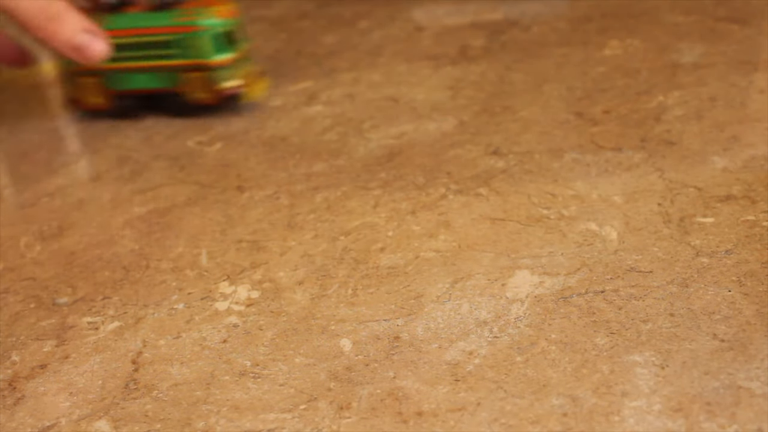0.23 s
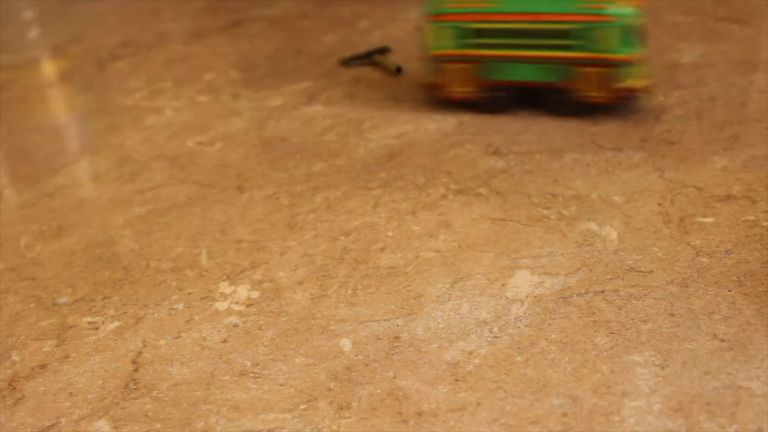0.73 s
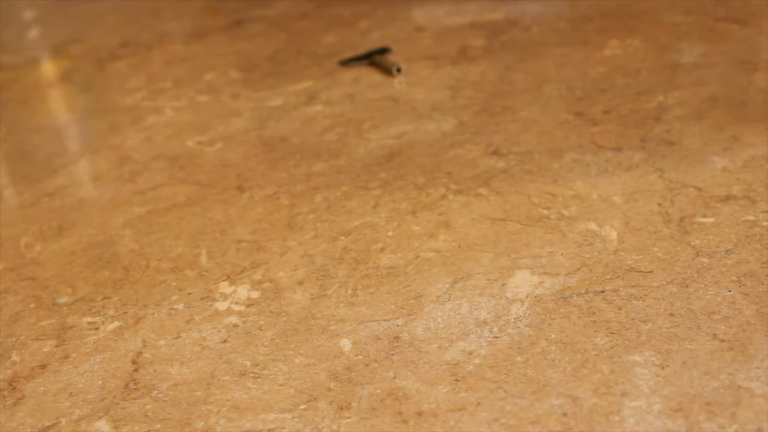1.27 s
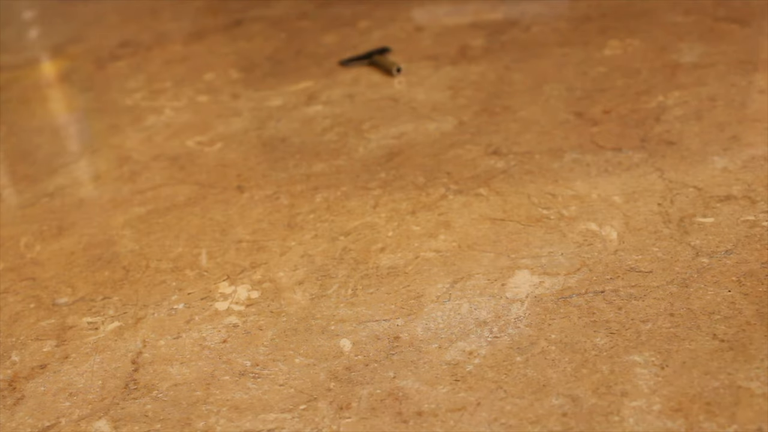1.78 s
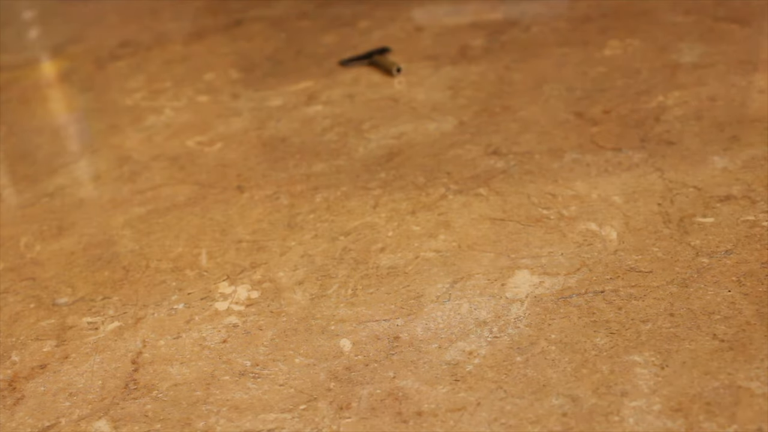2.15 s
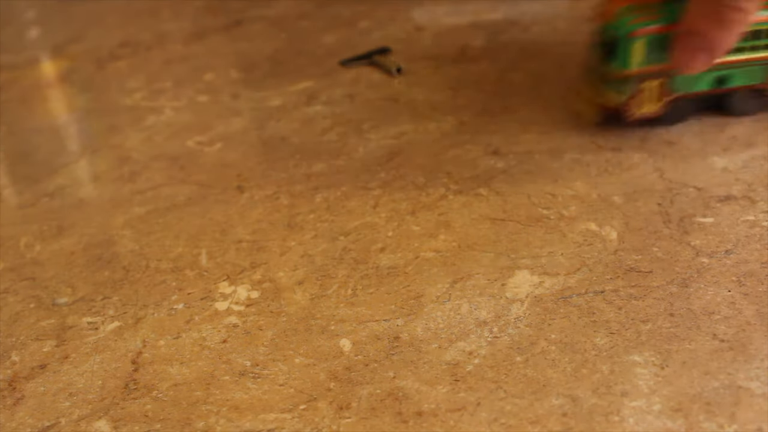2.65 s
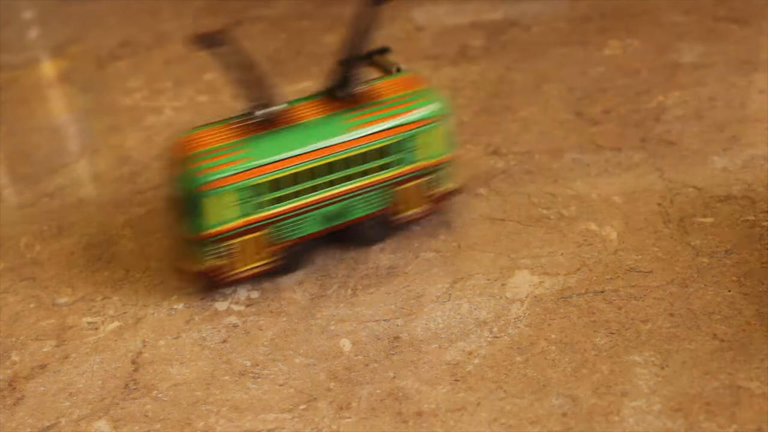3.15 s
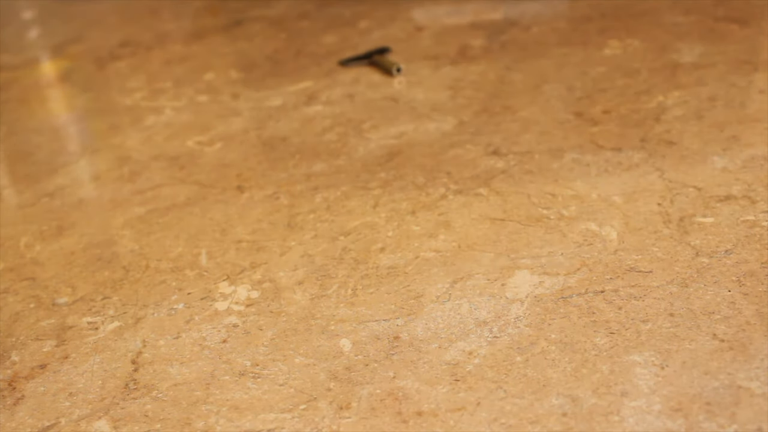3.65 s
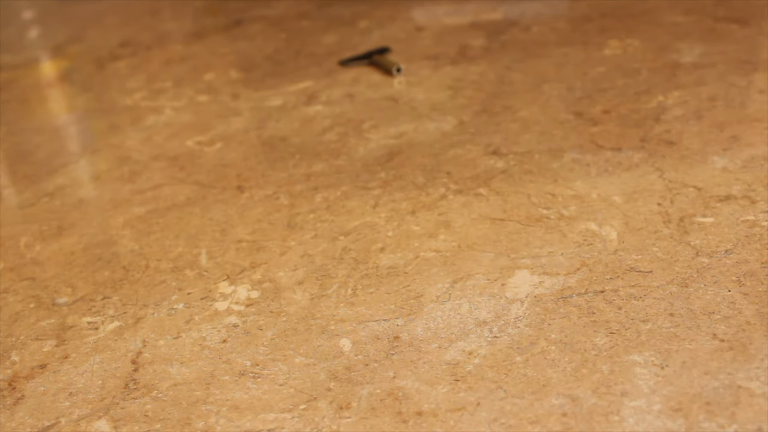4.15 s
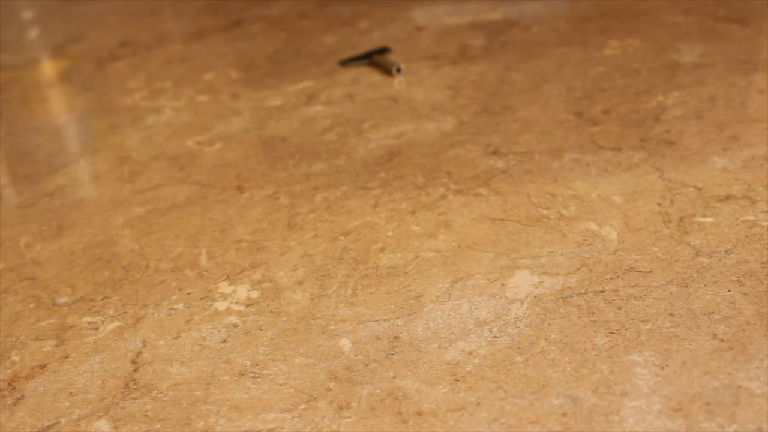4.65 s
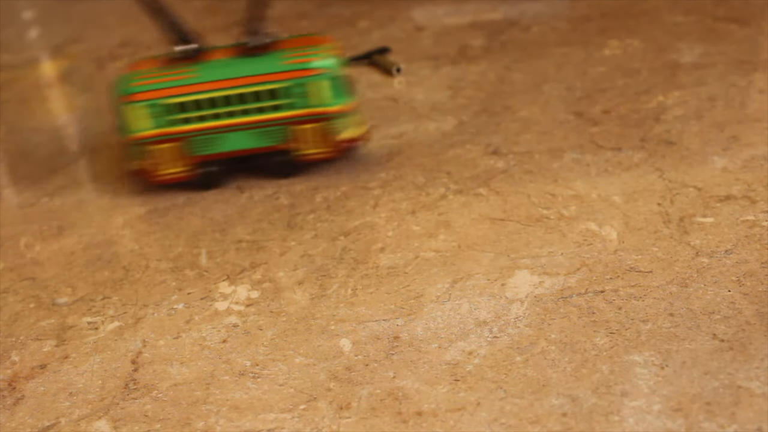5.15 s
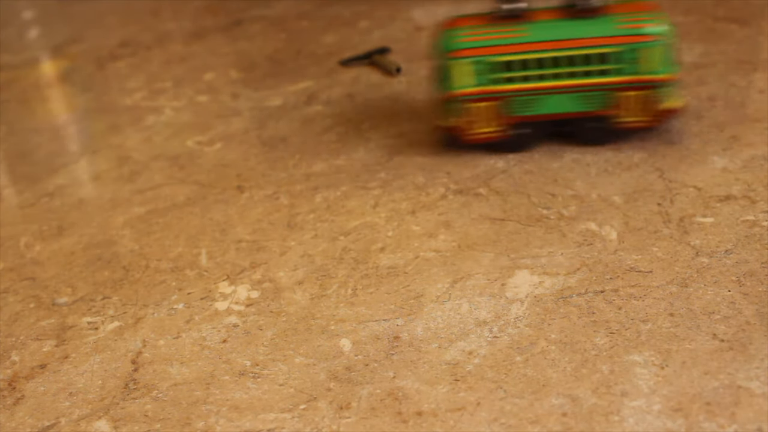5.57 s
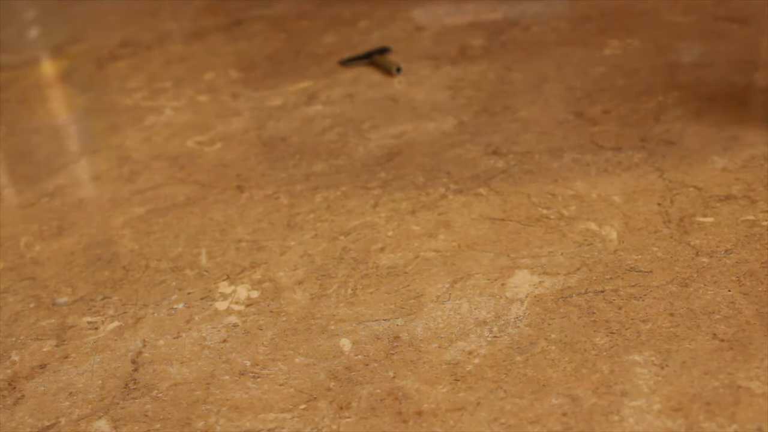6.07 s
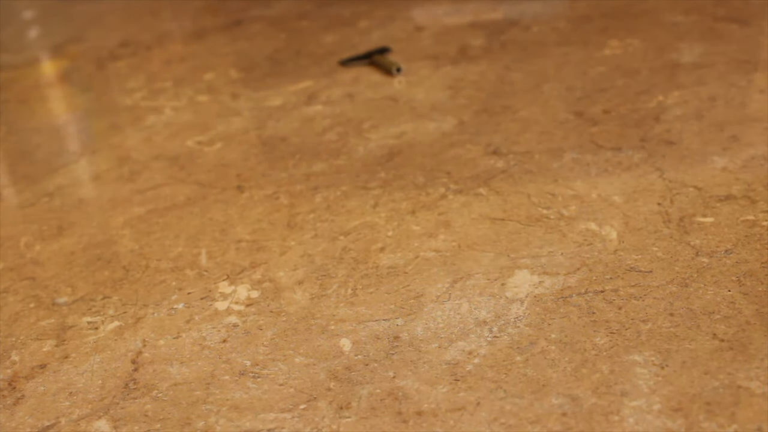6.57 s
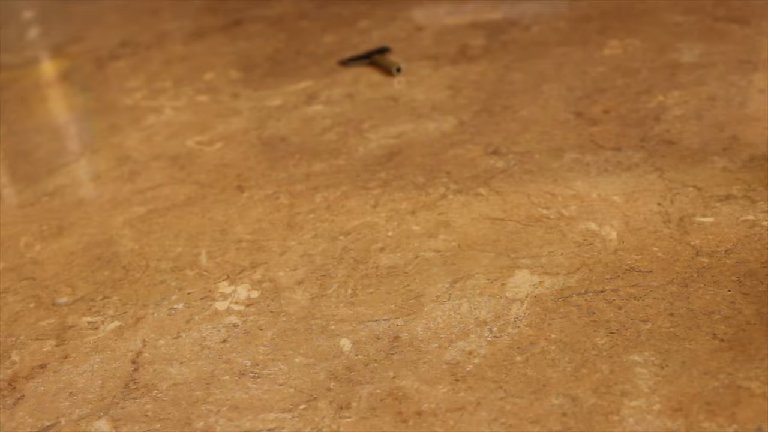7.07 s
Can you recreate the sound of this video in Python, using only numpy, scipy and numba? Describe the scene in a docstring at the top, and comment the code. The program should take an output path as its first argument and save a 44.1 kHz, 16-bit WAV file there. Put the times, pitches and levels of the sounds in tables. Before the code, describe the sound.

A small clockwork tin toy rattles and whirrs harshly across a stone floor, its metal key dropping with a bright clink, sharp knocks clustering later.

```python
"""A dense irregular rattle of gear teeth in a tin toy on a stone floor, under a governor hiss; rings come and go.
Random impacts drive noise through resonances of shell and panels; wheels and axles rumble, jolts knock the shell.
The winding key drops, bounces and rings as decaying sines, then whistles twice. A faint hum lies under it all.
A short room tail follows; the microphone thins the bass, ducks after overloads, clips and cuts the top."""
import sys
import numpy as np
from scipy import signal
from scipy.fft import rfft, irfft
from scipy.io import wavfile
from scipy.ndimage import uniform_filter1d, map_coordinates
from numba import njit

SR = 44100
rng = np.random.default_rng(int(sys.argv[2]) if len(sys.argv) > 2 else 0)


def waveform_to_disk(signal):
    """Save audio, clipped to [-1, 1], as 16-bit WAV at the path in sys.argv[1]."""
    frames = np.transpose(np.atleast_2d(signal))
    scaled = np.clip(frames, -1, 1) * 32767
    samples = np.round(scaled).astype(np.int16)
    wavfile.write(sys.argv[1], SR, samples)


N = 323248
T = np.arange(N) / SR

# balance as the toy goes to and fro: time_s, boom_db, wheels_db, governor_db, hum_db
AROUND = [(0, -38, -48.5, -23.5, -59), (.33, -38, -52.5, -27.5, -80), (.6, -40.5, -58, -31.5, -62),
          (1.05, -29, -41.5, -28.5, -60), (1.35, -28.5, -46, -26.5, -52.5), (1.85, -37, -46, -28.5, -53),
          (2.3, -28, -51, -28, -53), (2.6, -26.5, -44, -28.5, -55), (3, -31.5, -47.5, -26.5, -70),
          (3.5, -42.5, -50, -25.5, -68), (3.9, -39, -40.5, -26.5, -64), (4.3, -46.5, -41.5, -24.5, -56),
          (4.75, -34, -50, -26, -61), (5, -40, -64, -27, -69), (5.5, -33, -49, -29, -67),
          (5.9, -29, -46.5, -30, -56), (6.4, -33, -44.5, -31, -57), (6.85, -37.5, -50, -33, -53.5),
          (7.1, -33.5, -53, -33, -50), (7.33, -30, -50, -33, -56)]
# jolts of wheels and gears: time_s, knock_peak_db, rattle_stir_db
KNOCKS = [(0.4527, -10, 0), (0.7063, -9, -0.5), (0.743, -13, 0), (0.8056, -18, -1), (0.833, -12, 0.5),
          (0.9994, -17, 1), (2.32, -30, 2), (2.46, -30, 1), (2.5431, -14, 2), (2.77, -29, 1),
          (3.005, -30, 1.5), (3.034, -15, -2.5), (3.243, -8, 0.5), (3.34, -30, 2), (3.4394, -10, 1.5),
          (3.525, -30, 2.5), (3.5913, -12, -2), (3.7044, -15, 2.5), (3.87, -30, 1.5), (3.9933, -8, 0.5),
          (4.003, -11, -0.5), (4.0796, -10, 1), (4.1914, -19, -1.5), (4.2961, -17, -1), (4.346, -7, 1.5),
          (4.357, -5, -2), (4.465, -30, 1), (4.555, -14, 0.5), (4.6, -30, 2.5), (4.7167, -7, 2.5),
          (4.7372, -7, 0.5), (4.8948, -2, 2), (5.075, -18, 1.5), (5.099, -17, 1), (5.2385, -11, 1),
          (5.3, -30, 2.5), (5.465, -19, 1), (5.695, -15, -0.5), (5.735, -17, 0), (5.91, -26, 1.5),
          (6.1558, -10, 1), (6.2194, -10, 3), (6.3325, -22, 2.5), (6.385, -30, 0.5), (6.63, -30, 0.5),
          (6.902, -16, 0), (6.925, -22, 1), (6.95, -16, 3), (7.0704, -17, -1), (7.102, -12, 1),
          (7.13, -22, 0.5), (7.162, -20, -0.5), (7.205, -18, 1), (7.255, -20, -1.5), (7.283, -19, 2.5)]
# broad rings of the struck shell: centre_hz, width_hz, level_db
SHELL_RINGS = [(1290, 850, -2), (2050, 840, -2), (3330, 1200, 1), (6060, 1600, -6)]


def undb(db):
    """Decibels to amplitude."""
    return 10 ** (np.asarray(db) / 20)


def unit(x):
    """Scale to an rms of 1."""
    return x / np.sqrt(np.mean(x ** 2))


def noise(length=N):
    """White Gaussian noise."""
    return rng.standard_normal(length)


def columns(table):
    """Every column after the time, joined by straight lines."""
    s, *rest = np.transpose(table)
    return [np.interp(T, s, c) for c in rest]


def bumps_db(times_s, levels_db, spread_s):
    """Sum of Gaussian level bumps; a negative level is a dip."""
    return sum(db * np.exp(-.5 * ((T - s) / spread_s) ** 2) for s, db in zip(times_s, levels_db))


def walk(rate_hz):
    """Random levels held 1 / rate_hz and slewed twice; spread near 1."""
    k = int(SR / rate_hz)
    steps = np.repeat(noise(N // k + 1), k)
    return 1.3 * uniform_filter1d(uniform_filter1d(steps, k), k)[:N]


def ring(x, hz, width_hz):
    """One resonance; its peak height does not depend on its width."""
    return signal.lfilter(*signal.iirpeak(hz, hz / width_hz, SR), x)


@njit
def glide(x, hz, width_hz):
    """State-variable band-pass with a moving centre."""
    y, band, low = np.empty(len(x)), 0., 0.
    for i in range(len(x)):
        g, damping = np.tan(np.pi * hz[i] / SR), width_hz / hz[i]
        v = (band + g * (x[i] - low)) / (1 + g * (g + damping))
        band, low, y[i] = 2 * v - band, low + 2 * g * v, damping * v
    return y


def body(x, modes, drift_db, rate_hz):
    """A set of resonances, each swelling and fading on its own as the toy moves and turns."""
    out = 0
    for k, (hz, width_hz, db) in enumerate(modes):
        out = out + (-1) ** k * undb(db + drift_db * walk(rate_hz)) * ring(x, hz, width_hz)
    return unit(out)


def colour(x, points):
    """Shape a sound by a (Hz, dB) spectrum."""
    hz, db = np.transpose(points)
    f = np.maximum(np.fft.rfftfreq(N, 1 / SR), 1)
    gain = undb(np.interp(np.log(f), np.log(hz), db, left=-90, right=-90))
    return unit(irfft(rfft(x) * gain, N))


def thicket(force, points, width_hz, drift_db, sway_s, count):
    """Many narrow sheet modes under a (Hz, dB) outline; four panels flex so that their pitches wander."""
    hz, db = np.transpose(points)
    swells = [undb(drift_db * walk(11)) for _ in range(12)]
    out = 0
    for panel in range(4):
        shake = force * noise()
        centres = rng.uniform(hz[1], hz[-2], count)
        levels_db = np.interp(np.log(centres), np.log(hz), db)
        rings = 0
        for k, (f, g) in enumerate(zip(centres, levels_db)):
            rings = rings + undb(g) * swells[(k + 3 * panel) % 12] * ring(shake, f, width_hz)
        # reading at a swaying place bends every pitch
        place = np.arange(N) + sway_s * SR * walk(2)
        out = out + map_coordinates(rings, [place], order=3, mode="nearest")
    return unit(out)


def teeth(scatter_db, wobble_db):
    """Tooth impacts at random moments, a few harder; out-of-round wheels press them unevenly."""
    teeth_per_s, wobble_rate_hz = 4000, 15
    hit = rng.random(N) < teeth_per_s / SR
    hard = undb(scatter_db * np.minimum(rng.exponential(size=N), 3)) * undb(wobble_db * walk(wobble_rate_hz))
    return hit * hard + 0.2


def rattle_level():
    """Gear rattle amplitude: slow course, stirred around each jolt, with fast random flicker."""
    # slow level of the gear rattle: time_s, level_db
    slow_course = [(0, -24.5), (.19, -19), (.25, -21.5), (.36, -21.5), (.5, -19), (.75, -20), (1.05, -18.5),
                   (1.42, -19.5), (1.68, -22.5), (1.95, -20.5), (2.15, -20.5), (2.5, -20.5), (2.95, -18.5),
                   (3.3, -21), (3.9, -21.5), (4.25, -22.5), (4.6, -21), (4.8, -21.5), (5.25, -21.5),
                   (5.37, -20.5), (5.5, -18), (6.1, -21.5), (6.4, -21.5), (6.55, -23), (6.87, -25.5),
                   (7.33, -23)]
    times_s, _, stirs_db = np.transpose(KNOCKS)
    stir_db = bumps_db(times_s, stirs_db, spread_s=.019)
    return undb(columns(slow_course)[0] + stir_db + 0.5 * walk(70) + 0.27 * walk(30))


def tin_shell(force):
    """Tooth force rattles the tin modes, the bare mechanism and a thicket of thin-sheet modes."""
    # tin shell modes: centre_hz, width_hz, level_db
    tin_modes = [(1280, 110, -2), (1711, 25, 3), (1812, 28, 5.5), (2410, 150, -6.5), (2510, 33, 5),
                 (2885, 37, 1.5), (4940, 72, 2.5), (5926, 75, 1.5), (7250, 110, 1.5)]
    # spectrum of the mechanism without its rings: frequency_hz, level_db
    bare_outline = [(410, -44), (700, -7.5), (920, -3), (1130, -2), (1390, -0.5), (3190, 0), (4470, -6),
                    (7080, -5.5), (9500, -12), (12400, -67), (20900, -120)]
    out = undb(-10) * body(force * noise(), tin_modes, drift_db=2.2, rate_hz=14)
    out += undb(-4) * colour(force * noise(), bare_outline)
    out += undb(-5.5) * thicket(force, bare_outline[:-2], width_hz=40.5, drift_db=5, sway_s=.005, count=16)
    return out * np.sqrt(np.mean(force ** 2))


def singing(press):
    """Tin parts sing in turn: each narrow ring fades in and out, its pitch wanders, its level flickers."""
    # one part sings for a while as the toy turns: start_s, length_s, pitch_hz, level_db
    songs = [(-.05, .29, 1150, -25), (.34, 0.09, 1575, -26.5), (.45, 0.12, 1560, -28.5),
             (0.29, .19, 4010, -29.5), (0.951, 0.41, 2133, -32), (1.04, 0.44, 980, -34),
             (1.097, 0.44, 1162, -29.5), (1.365, 0.27, 5030, -34), (1.43, 0.63, 1300, -34),
             (2.1, 0.22, 1270, -32), (2.255, 0.1, 1157, -23), (2.34, 0.17, 2200, -28.5),
             (2.351, 0.43, 1560, -31), (2.55, 0.31, 2100, -28), (3.119, 0.36, 1100, -35),
             (3.559, .22, 3950, -35), (4.19, 0.1, 3480, -28), (4.66, 0.3, 1303, -30.5),
             (4.801, 0.3, 3480, -35), (5.149, 0.42, 1784, -32.5), (5.66, 0.12, 2050, -26.5),
             (5.8, 0.15, 2050, -34), (5.7, 0.17, 1563, -30), (5.9, 0.15, 1575, -27.5),
             (6.07, .07, 1570, -26), (6.2, .1, 1560, -31), (6.37, 0.046, 1590, -19),
             (6.33, 0.12, 2550, -30), (6.5, .18, 2550, -32), (7.16, 0.08, 1130, -27),
             (7.28, .05, 1120, -28), (7.09, .06, 1310, -28), (6.94, 0.054, 1190, -28),
             (6.3, 0.15, 809, -35), (6.17, .06, 1150, -28), (6.34, .12, 1110, -29), (5.85, 0.18, 950, -36),
             (.08, 0.14, 6100, -33), (1.2, 0.45, 6700, -32), (2.7, 0.39, 6600, -31.5),
             (3.2, 0.52, 6210, -33), (4.0, 0.22, 6000, -32), (4.15, .22, 6850, -29.5),
             (5.65, 0.23, 7000, -30.5), (7.07, .1, 1688, -31)]
    q, fade_s, wander_share = 20, .035, .008
    # the louder a ring, the more of it is steady whine
    clean_max, clean_from_db, clean_span_db = .6, -31, 7
    out, bend, flicker = np.zeros(N), 1 + wander_share * walk(7), undb(1.5 * walk(40))
    for k, (s, length_s, hz, db) in enumerate(songs):
        part = slice(max(int((s - fade_s) * SR), 0), int((s + length_s + fade_s) * SR))
        inside_s = np.minimum(T[part] - s, s + length_s - T[part])
        shape = np.clip(.5 + inside_s / (2 * fade_s), 0, 1)
        shake = press[part] * noise(len(shape))
        # rolled so that no two neighbouring rows wander alike
        own_hz, own_flicker = (np.roll(v, k * SR // 3)[part] for v in (hz * bend, flicker))
        rough = unit(glide(glide(shake, own_hz, 3.5 * hz / q), own_hz, hz / q))
        steady = np.sqrt(2) * np.sin(2 * np.pi * np.cumsum(own_hz) / SR)
        clean = clean_max * np.clip((db - clean_from_db) / clean_span_db, 0, 1)
        out[part] += undb(db) * shape * unit(own_flicker * (clean * steady + (1 - clean) * rough))
    return out


def background_singing(press, rattle):
    """The singing parts also ring softly throughout, following the rattle."""
    # singing parts: centre_hz, width_hz, relative_db
    soft_modes = [(1148, 51, 1.5), (1589, 50, -0.5), (2090, 220, 1.5), (4065, 115, -1)]
    out = np.zeros(N)
    for hz, width_hz, db in soft_modes:
        rung = ring(ring(press * noise(), hz, 4 * width_hz), hz, width_hz)
        out += rattle * undb(db - 15.5 + 1.27 * walk(5.17)) * unit(rung)
    return out


def strikes():
    """Hundreds of tooth strikes a second: sharp clicks through the broad rings of the shell."""
    strikes_per_s, scatter_db = 320, 2
    hit = (rng.random(N) < strikes_per_s / SR) * undb(scatter_db * np.minimum(rng.exponential(size=N), 3))
    return unit(sum((-1) ** k * undb(db) * unit(ring(hit, hz, width_hz))
                    for k, (hz, width_hz, db) in enumerate(SHELL_RINGS)))


def gear_whine(load):
    """Narrow noise band at the pitch of the fastest gear pair, drifting with the speed."""
    # whine of the fastest gear pair: time_s, pitch_hz, level_db
    whine_course = [(0, 3180, -36), (.6, 3250, -38), (.75, 3200, -31.5), (.95, 3160, -30), (1.1, 3110, -31),
                    (1.28, 3140, -32), (1.45, 3040, -27), (1.56, 3040, -40), (2.2, 3140, -41),
                    (2.85, 3230, -37), (2.97, 3290, -28), (3.04, 3200, -23), (3.12, 3160, -27),
                    (3.25, 3120, -33), (3.33, 3090, -26), (3.42, 3140, -36), (3.6, 3140, -40),
                    (5.3, 3090, -36), (5.45, 3100, -32), (5.6, 3120, -35), (6.05, 3150, -36),
                    (6.15, 3170, -29), (6.25, 3170, -32), (6.4, 3190, -39), (7.33, 3170, -34)]
    hz, db = columns(whine_course)
    return undb(db) * unit(glide(glide(load * noise(), hz, 200.0), hz, 60.0))


def frame_and_tabs(load):
    """Two broad rings, gear frame and small tabs, whose loudest place slides as the toy turns."""
    # sliding rings: time_s, frame_hz, frame_db, tabs_hz, tabs_db
    slide_course = [(0, 3240, -25.5, 6400, -18.5), (.4, 3400, -31.5, 6030, -23.5),
                    (.75, 3120, -34, 7000, -43), (1.5, 3240, -27.5, 6500, -24),
                    (1.95, 3250, -27, 6600, -28), (2.9, 3250, -28, 6400, -31),
                    (3.65, 2990, -29.5, 6700, -21), (4.25, 3420, -24.5, 6140, -19.5),
                    (4.75, 3200, -29.5, 6850, -22.5), (5.45, 3280, -30.5, 6620, -27),
                    (5.75, 3150, -29, 7250, -36), (6.5, 3300, -32.5, 6300, -24),
                    (6.95, 3200, -34, 6300, -31), (7.33, 3250, -33, 6750, -27)]
    frame_hz, frame_db, tabs_hz, tabs_db = columns(slide_course)
    frame = unit(glide(glide(load * noise(), frame_hz, 1000.0), frame_hz, 480.0))
    tabs = unit(glide(glide(load * noise(), tabs_hz, 4400.0), tabs_hz, 2200.0))
    return undb(frame_db - 3) * frame + undb(tabs_db - 5) * tabs


def panel_boom(drive):
    """Large panels resonate low under the gear force."""
    # large panels: centre_hz, width_hz, level_db
    panel_modes = [(700.4, 59, 1), (783, 54, 0.5), (844, 22, 0), (945, 56, 0), (1100, 220, -3.5)]
    return body(drive * noise(), panel_modes, drift_db=2, rate_hz=6)


def governor(load):
    """Hiss of the spinning governor; its fan beats, slightly unevenly, and thin sheet colours it."""
    # hiss outline: frequency_hz, level_db
    hiss_outline = [(7500, 6), (8800, 0), (9900, 4.5), (10700, -2), (11800, 3), (13500, 4.5), (15000, 1.5),
                    (16500, 5.5)]
    beat_hz, beat_db = 23.6, 0.74
    beat = np.sin(2 * np.pi * beat_hz * (T + 0.0093 * walk(2.98)))
    spin = (load + 2.2) * undb(1.35 * walk(90) + beat_db * beat)
    air = colour(spin * noise(), hiss_outline)
    return air + undb(-5) * thicket(spin, hiss_outline, width_hz=200, drift_db=5.5, sway_s=.008, count=10)


def wheels():
    """Wheels rumble on the floor: noise through low modes, independent of the teeth."""
    # wheel modes: centre_hz, width_hz, level_db
    wheel_modes = [(296, 81, -8.5), (356, 39, 2), (416, 44, 0.5), (475, 70, -6.5)]
    return body(noise(), wheel_modes, drift_db=3, rate_hz=8)


def axles():
    """Axles rumble: noise through two modes above those of the wheels."""
    # axle modes: centre_hz, width_hz, level_db
    axle_modes = [(512, 46, 4.5), (571, 69, 3.5)]
    return body(noise(), axle_modes, drift_db=2.5, rate_hz=4.08)


def whirr_dips():
    """Gain of the brief dips in the whirr."""
    # brief level changes, nearly all dips: time_s, change_db
    lulls = [(.252, -4), (.432, -3), (.475, -3), (.592, -2.5), (.623, -4), (.913, 1), (1.023, -2),
             (2.018, -3), (2.15, -2.5), (2.374, -3), (2.503, -1), (2.537, -2), (2.792, -5), (2.98, -3),
             (3.053, -1), (3.776, -1.5), (3.957, -3), (4.034, -2), (4.073, -2), (4.23, -4), (4.29, -3),
             (4.404, -2.5), (4.534, -2.5), (4.668, -1.5), (4.708, -1.5), (4.791, -4), (4.831, -2.5),
             (4.987, -2), (5.186, -0.5), (5.357, -2), (5.39, -3), (5.637, -2.5), (5.873, -2.5), (6.174, -2),
             (6.324, -3.5), (6.869, -1.5), (7.216, -2)]
    return undb(bumps_db(*np.transpose(lulls), spread_s=.0064))


def hum():
    """A low wavering hum of the room: noise through a few narrow resonances."""
    # hum resonances: centre_hz, width_hz, level_db
    hum_modes = [(102.5, 16, -6.5), (132, 30, -17), (175.7, 7.9, 0.5), (272, 32, -1)]
    highpass = signal.butter(4, 90, "high", fs=SR, output="sos")
    air = signal.sosfilt(highpass, ring(noise(), 176, 280))
    return undb(columns(AROUND)[3]) * body(air, hum_modes, drift_db=2.5, rate_hz=4)


def knocks(press):
    """Each jolt is a short cluster of blows into the broad rings of the shell."""
    decay_s, first_blow_ratio, vary_db = .0066, 1.2, 2
    out, t = np.zeros(N), np.arange(int(.04 * SR)) / SR
    for s, peak_db, _ in KNOCKS:
        at = int(s * SR)
        blows = press[at:at + len(t)] * noise(len(t)) * np.exp(-t / decay_s)
        blows[0] = first_blow_ratio * np.max(np.abs(blows))
        rung = np.zeros(len(t))
        for hz, width_hz, db in SHELL_RINGS:
            # each knock lands elsewhere
            own_db = db + vary_db * rng.standard_normal()
            rung += undb(own_db) * unit(ring(ring(blows, hz, 2 * width_hz), hz, width_hz))
        out[at:at + len(t)] += undb(peak_db) * rung / np.max(np.abs(rung))
    return out


def toy():
    """One stream of tooth impacts drives shell, panels and governor; the wheels roll on their own."""
    rattle = rattle_level()
    boom_db, wheels_db, governor_db, _ = columns(AROUND)
    press = unit(teeth(scatter_db=1.8, wobble_db=0.5))
    force = press * rattle
    # whine, frame, tabs, panels and governor feel the quick changes of load on the gears
    load = force / uniform_filter1d(rattle, SR // 4)
    whirr = tin_shell(force)
    whirr += singing(press) + background_singing(press, rattle)
    whirr += rattle * undb(-12) * strikes()
    whirr += gear_whine(load) + frame_and_tabs(load)
    whirr += undb(boom_db) * panel_boom(load + press)
    whirr += undb(governor_db) * governor(load)
    whirr += undb(wheels_db) * wheels()
    # the axles follow the panel boom
    return whirr * whirr_dips() + knocks(press) + undb(boom_db - 14.5) * axles()


def key_clinks():
    """Steel key lands and bounces: each blow is decaying modes plus a broad snap of steel on stone."""
    # landing and bounces: time_s, level_db
    key_hits = [(.5294, -3), (.533, -16), (.5375, -13), (.5975, -22), (.654, -25)]
    # key modes: pitch_hz, level_db, t60_s
    key_modes = [(1167, -12.5, 0.1), (1930, -6, 0.017), (3060, -2, 0.016), (4300, -3, 0.01),
                 (5500, -21, 0.34), (6000, -3.5, 0.03)]
    crack_db, crack_s = -6, .0012
    out, t = np.zeros(N), np.arange(int(.3 * SR)) / SR
    clink = sum(undb(db) * np.sin(2 * np.pi * hz * t) * 1000. ** (-t / t60) for hz, db, t60 in key_modes)
    clink += undb(crack_db) * unit(ring(noise(len(t)), 3000, 4000)) * np.exp(-t / crack_s)
    # too small to radiate bass
    clink = signal.sosfilt(signal.butter(2, 500, "high", fs=SR, output="sos"), clink)
    for s, db in key_hits:
        at = int(s * SR)
        out[at:at + len(t)] += undb(db) * clink
    return out


def key_whistle():
    """The key rocks on its edge and whistles twice: one thin tone that swells and fades."""
    # whistles: start_s, rise_s, length_s, crest_rms_db
    rocks = [(0.596, 0.025, 0.079, -19.5), (0.78, .025, 0.081, -24.5)]
    pitch_hz, edge_db = 8497, -18  # edge: level at both ends, against the crest
    level = np.zeros(N)
    for s, rise_s, length_s, db in rocks:
        shape_db = np.interp(T - s, [0, rise_s, length_s], [edge_db, 0, edge_db], left=-99, right=-99)
        level += undb(db + shape_db)
    return np.sqrt(2) * level * np.sin(2 * np.pi * pitch_hz * T)


def room(x):
    """The stone floor and near walls give a short dense tail."""
    t60_s, tail_db = .07, -11
    t = np.arange(int(.2 * SR)) / SR
    tail = noise(len(t)) * 1000. ** (-t / t60_s) * (t > .002)
    return x + undb(tail_db) * signal.fftconvolve(x, tail / np.sqrt(np.sum(tail ** 2)))[:N]


def scene():
    """Toy and key in the room over the hum, alike in both channels."""
    return np.tile(undb(-0.17) * room(toy() + key_clinks() + key_whistle()) + hum(), (2, 1))


def record(dry):
    """Microphone: bass loss, gain that drops after overloads and recovers, clipping, offset, rumble, top cut."""
    duck_above, duck_db, recovery_s = .65, -200, .17  # duck_db per unit of 10 ms mean overshoot
    clip_at, offset, rumble_db, top_hz = .98, .00086, -76, 15720
    thin = signal.sosfilt(signal.butter(2, 60, "high", fs=SR, output="sos"), dry)
    keep = np.exp(-1 / (recovery_s * SR))
    overshoot = np.maximum(np.abs(thin) - duck_above, 0)
    over = signal.lfilter([0, 100 / SR], [1, -keep], overshoot)
    # the shifted window looks only at the past
    thin = thin * undb(duck_db * uniform_filter1d(over, SR // 100, origin=SR // 201))
    rumble = undb(rumble_db) * unit(signal.lfilter(*signal.butter(1, 60, fs=SR), noise()))
    top_cut = signal.ellip(14, .2, 75, top_hz, fs=SR, output="sos")
    return signal.sosfilt(top_cut, np.clip(thin, -clip_at, clip_at) + offset + rumble)


dry = scene()
out = record(dry)
waveform_to_disk(out)
```